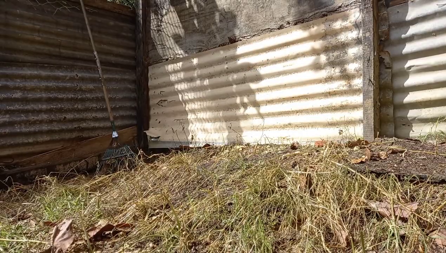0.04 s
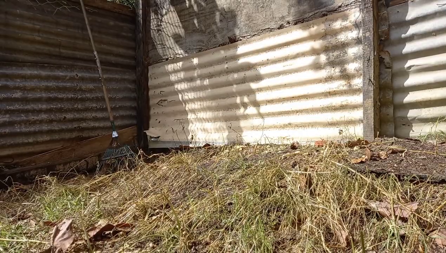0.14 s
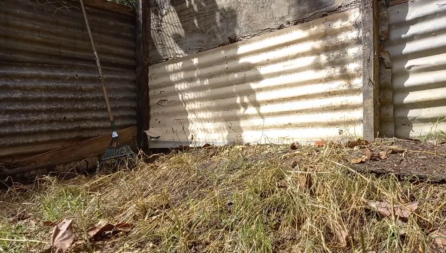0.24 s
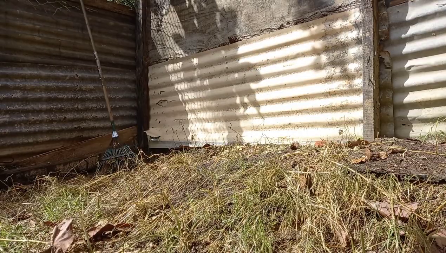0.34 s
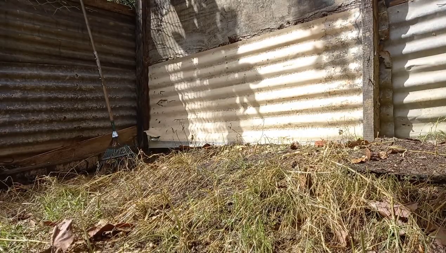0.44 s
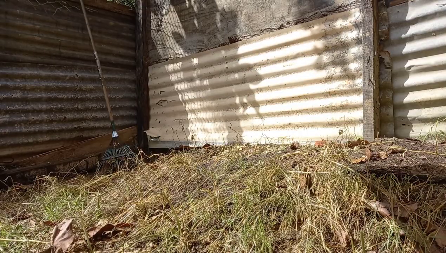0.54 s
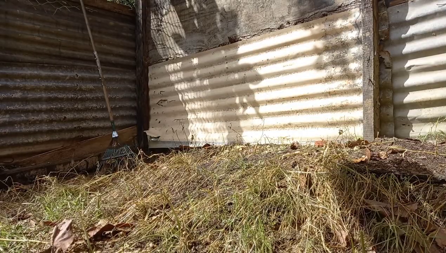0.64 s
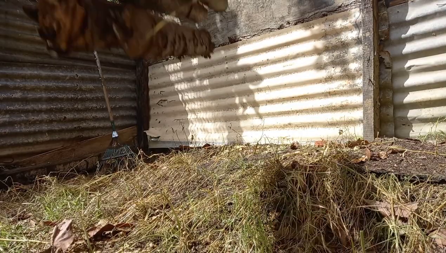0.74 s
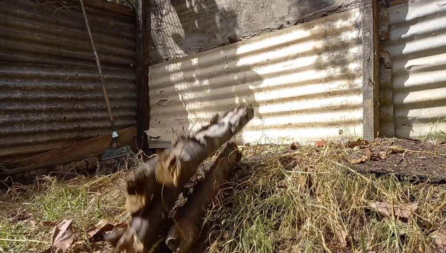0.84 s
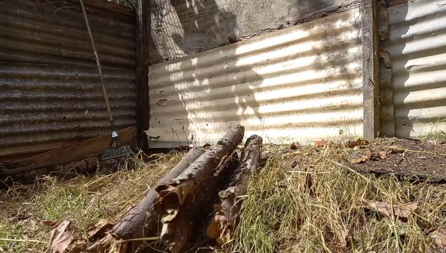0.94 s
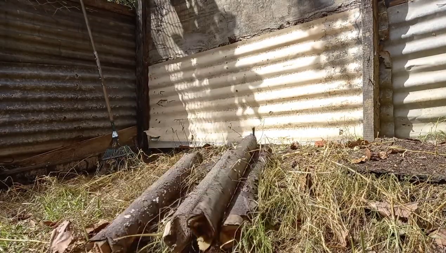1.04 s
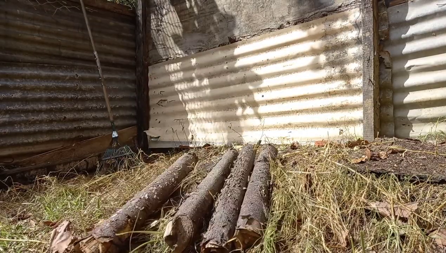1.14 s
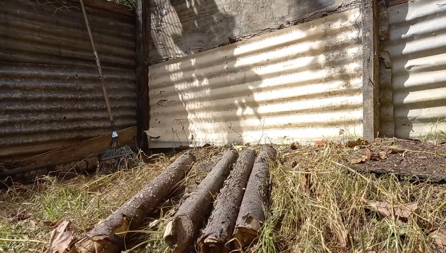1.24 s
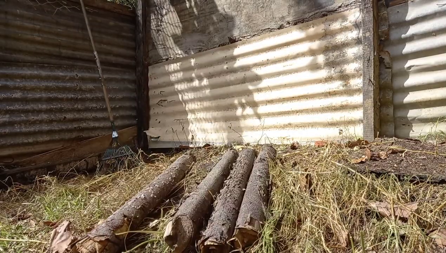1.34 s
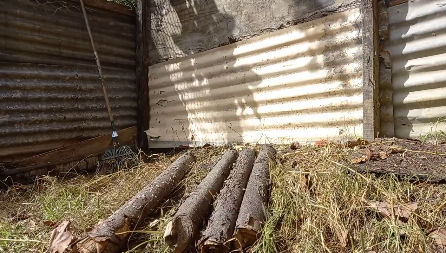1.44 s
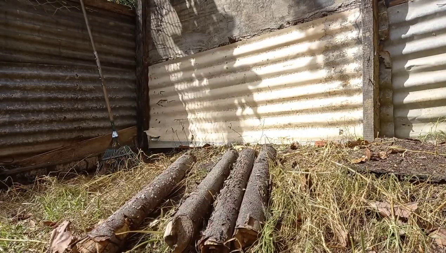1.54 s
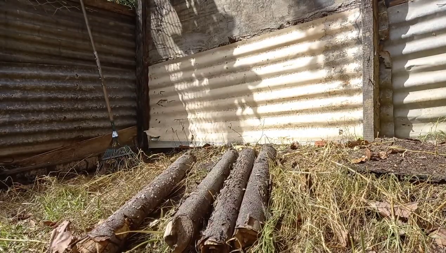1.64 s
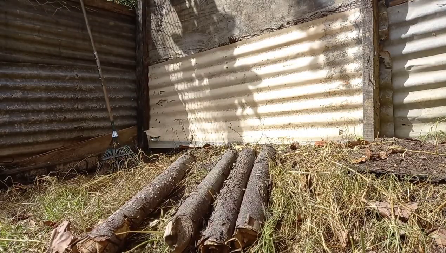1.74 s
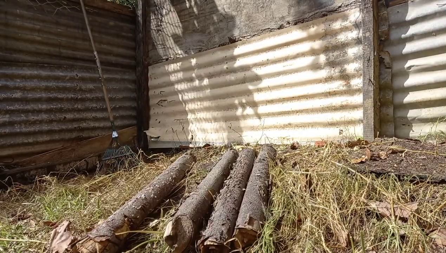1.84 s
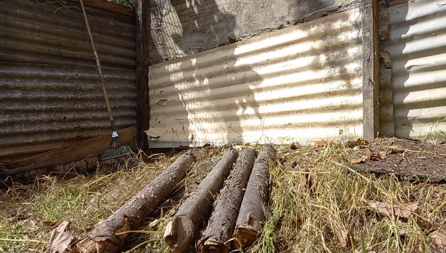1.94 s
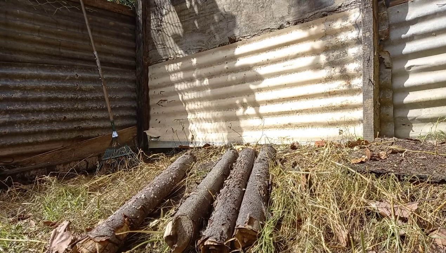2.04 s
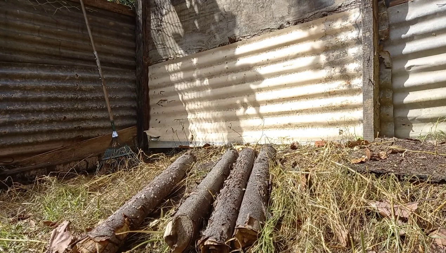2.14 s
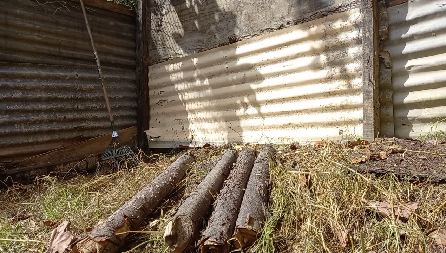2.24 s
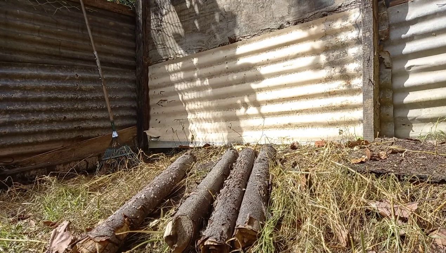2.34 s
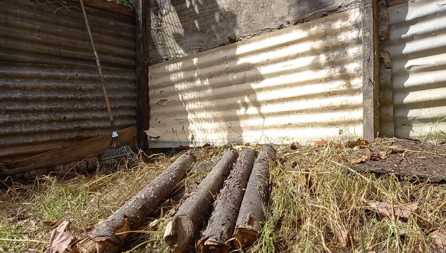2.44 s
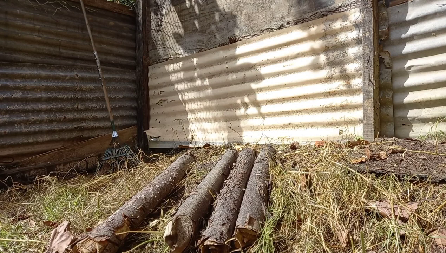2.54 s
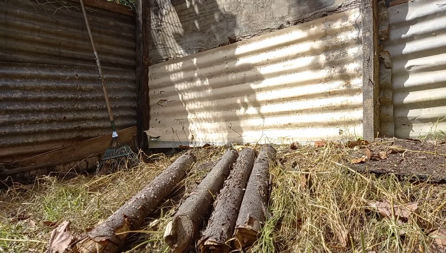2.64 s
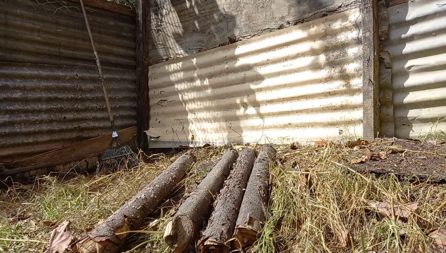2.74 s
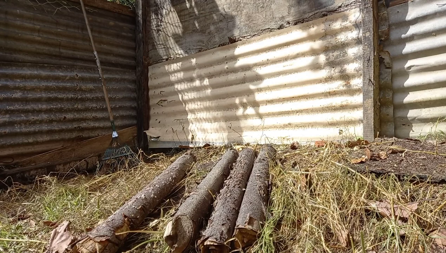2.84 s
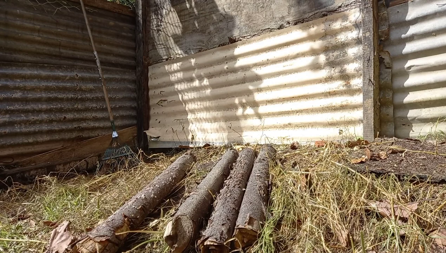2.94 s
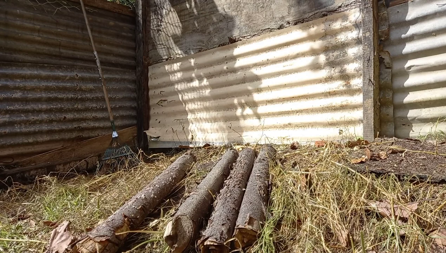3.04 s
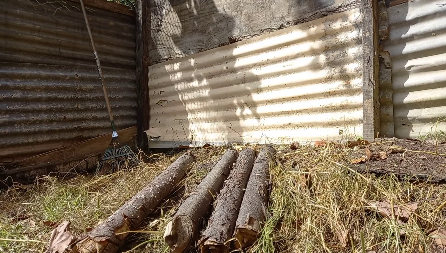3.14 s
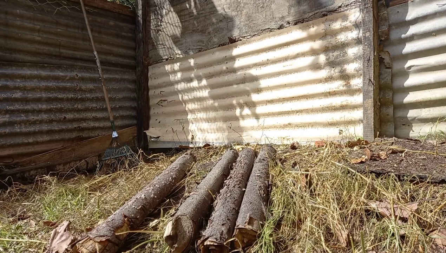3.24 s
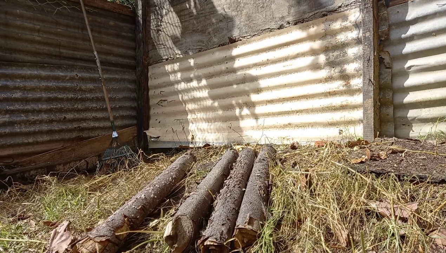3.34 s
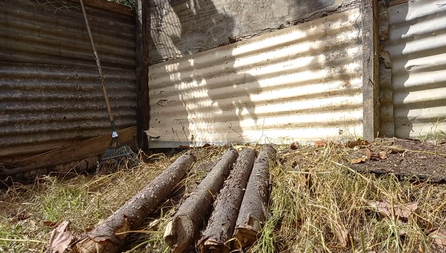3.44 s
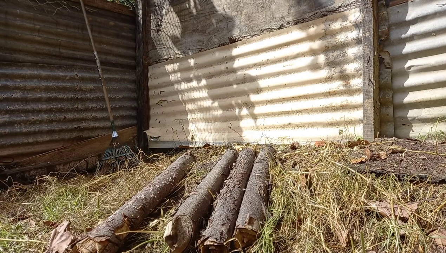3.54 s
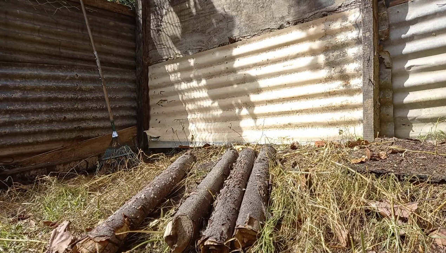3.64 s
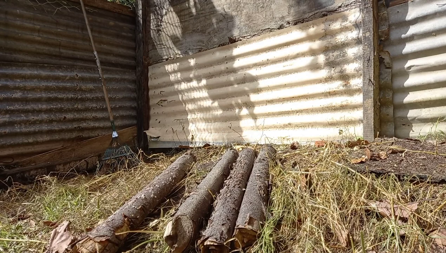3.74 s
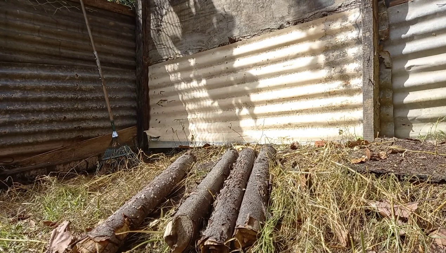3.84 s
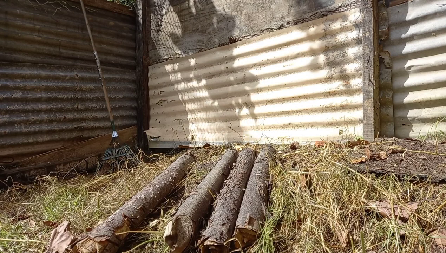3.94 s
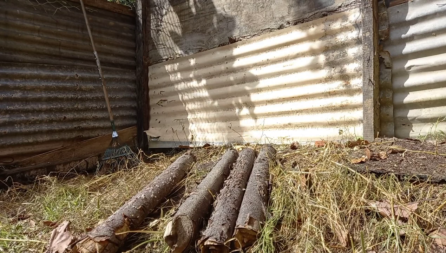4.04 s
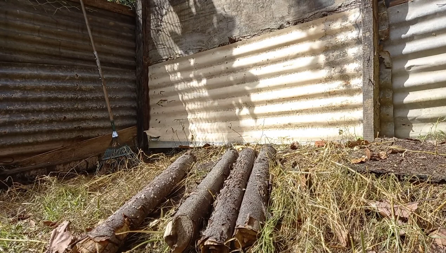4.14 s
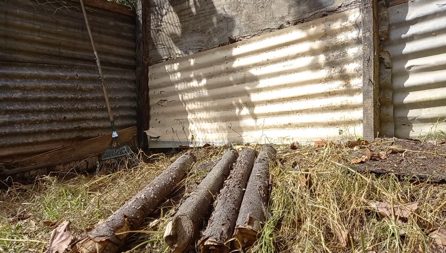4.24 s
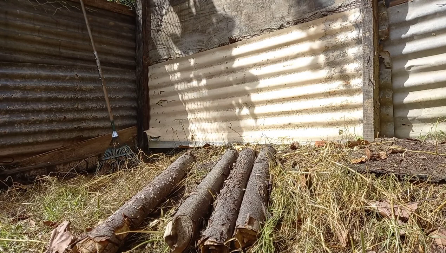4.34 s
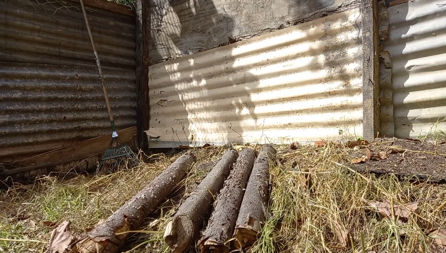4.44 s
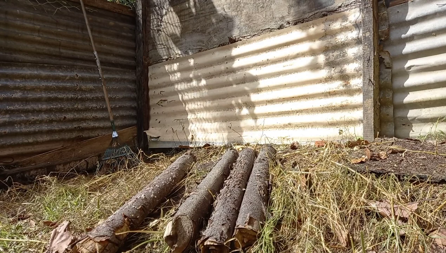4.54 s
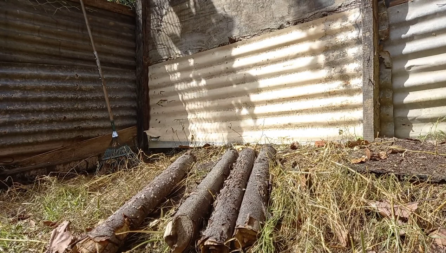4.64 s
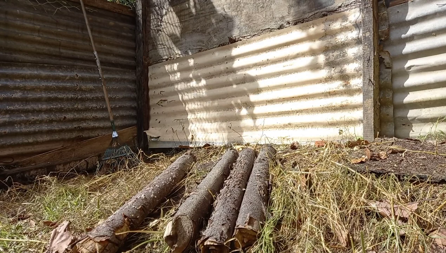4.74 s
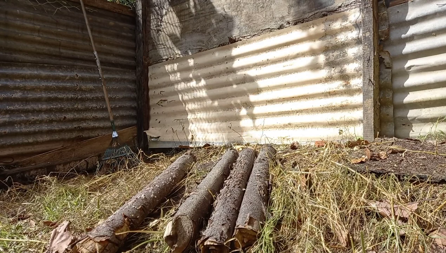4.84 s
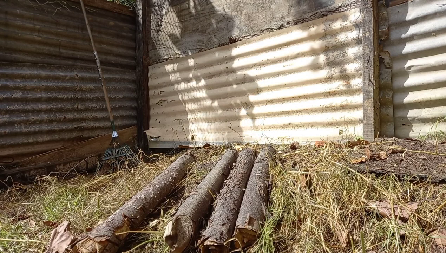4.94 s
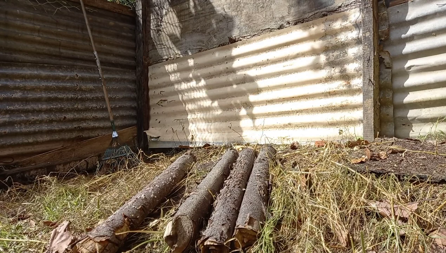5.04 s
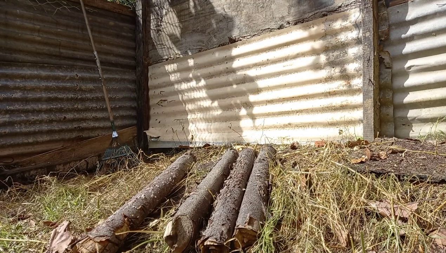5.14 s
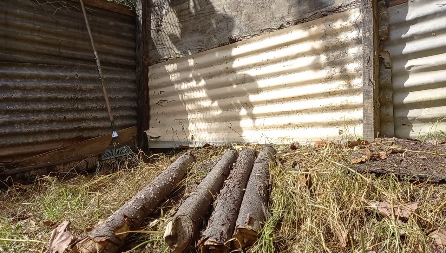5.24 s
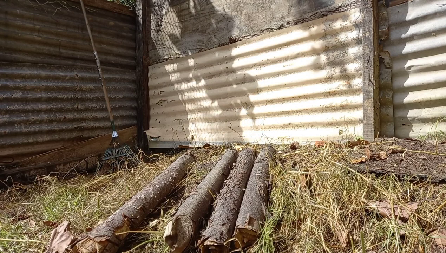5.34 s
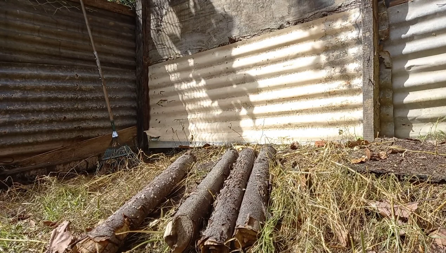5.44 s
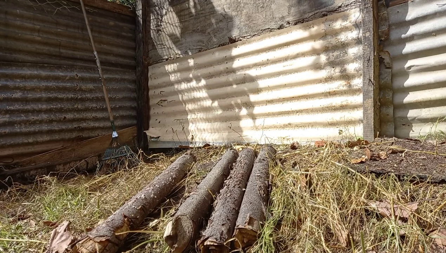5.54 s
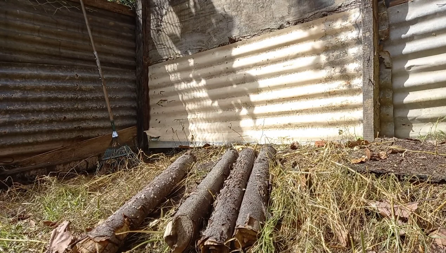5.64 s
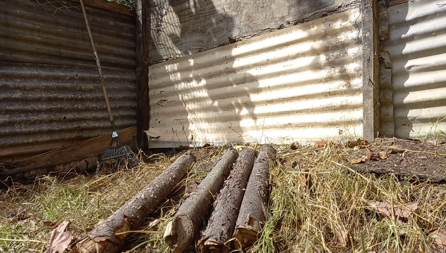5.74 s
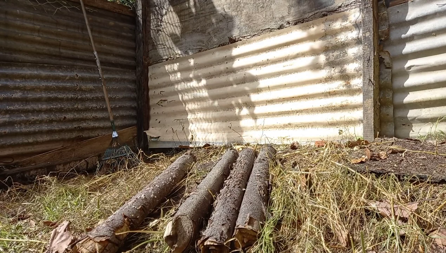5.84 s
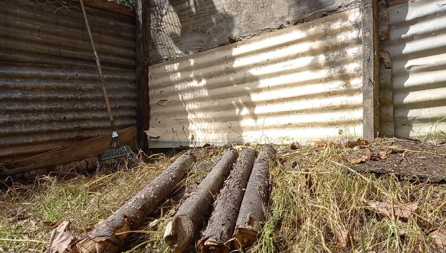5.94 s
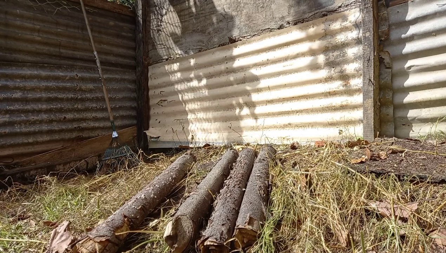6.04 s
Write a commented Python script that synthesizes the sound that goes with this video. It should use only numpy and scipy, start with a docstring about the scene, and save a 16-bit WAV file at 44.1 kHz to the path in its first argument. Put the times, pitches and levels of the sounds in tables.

```python
"""Logs dropped in a yard

An armful of logs bumps once, then falls on dry grass in a yard fenced with corrugated iron; one log rolls to rest.
Logs, soil and a humming fence sheet are fading or swelling sine tones, with bursts of noise for the bark.
Grass, stalks and shifting feet are crackling noise; two soft whumps are swells of low noise and a boom.
Small birds chatter and call in gliding tones, an engine drones far away and shaped noise makes the air."""
import sys
import numpy as np
from scipy import signal
from scipy.fft import rfft, irfft, next_fast_len
from scipy.io import wavfile
from scipy.ndimage import map_coordinates

SR = 44100
rng = np.random.default_rng(int(sys.argv[2]) if len(sys.argv) > 2 else 0)


def to_wav(sig):
    """Store sig (one row per channel, or 1-D mono) as 16-bit WAV at the path in sys.argv[1].

    Samples outside -1..1 are clipped; the rate is SR.
    """
    pcm = np.clip(np.atleast_2d(sig), -1, 1) * 32767
    pcm = np.round(pcm).astype(np.int16)
    wavfile.write(sys.argv[1], SR, pcm.T)  # frames by channels


N = 268727  # length in samples


def amp(db):
    """Turn decibels into a gain."""
    return 10 ** (np.asarray(db) / 20)


def unit(x):
    """Scale a sound to an rms level of 1."""
    return x / np.sqrt(np.mean(x ** 2) + 1e-20)


def along(points, hz):
    """Read a curve of (frequency_hz, value) points on a log frequency axis."""
    f, v = np.transpose(points)
    return np.interp(np.log(hz + 1), np.log(f + 1), v)


def level(curve):
    """Gain per sample from (time_s, level_db) rows, relative to their mean."""
    s, db = np.transpose(curve)
    return amp(np.interp(np.arange(N) / SR, s, db - db.mean()))


def wobble(rate, size=N):
    """A smooth random curve through rate random points a second."""
    points = rng.standard_normal(int(size * rate / SR) + 4)
    return map_coordinates(points, [np.arange(size) * rate / SR])


def filtered(x, response):
    """Multiply the spectrum of x by a response that depends on frequency."""
    n = x.shape[-1]
    m = next_fast_len(n + SR // 5)
    return irfft(rfft(x, m) * response(np.fft.rfftfreq(m, 1 / SR)), m)[..., :n]


def coloured(x, spectrum, size=4096):
    """Shape noise with a (frequency_hz, level_db) spectrum, keeping the power of white noise."""
    cepstrum = irfft(np.log(amp(along(spectrum, np.fft.rfftfreq(size, 1 / SR)))))
    # folding the cepstrum onto positive times makes a filter that never sounds early
    cepstrum[1:size // 2] *= 2
    cepstrum[size // 2 + 1:] = 0
    pulse = irfft(np.exp(rfft(cepstrum)))
    return signal.fftconvolve(x, pulse[None] / np.linalg.norm(pulse), axes=1)[:, :x.shape[1]]


def spread(pair, alike):
    """Mix two unrelated signals into a left and right of the given likeness."""
    def turn(hz):
        return np.arccos(np.clip(along(alike, hz), -1, 1)) / 2

    mid, side = filtered(pair, lambda hz: np.array([np.cos(turn(hz)), np.sin(turn(hz))]))
    return np.array([mid + side, mid - side])


def from_side(pair, lead):
    """A sound from the left reaches the left channel lead seconds before the right; negative is the right."""
    return filtered(pair, lambda hz: np.exp(1j * np.pi * hz * lead * np.array([[1], [-1]])))


def add(track, s, sound):
    """Mix a sound into a track at time s."""
    start = max(round(s * SR), 0)
    track[..., start:start + sound.shape[-1]] += sound[..., :N - start]


def fade(t, t60):
    """Free decay that falls 60 dB in t60 seconds."""
    return np.exp(-np.log(1000) * t / t60)


def crackle(rate, spread_db, hiss):
    """Two streams of tiny fractures, rate a second and uneven in size, over a smooth hiss."""
    sizes = amp(spread_db * np.minimum(rng.exponential(size=(2, N)), 4))
    happens = rng.random((2, N)) < rate / SR
    ticks = happens * sizes * rng.standard_normal((2, N))
    return unit(unit(ticks) + hiss * rng.standard_normal((2, N)))


SAG_DB_PER_S = 29  # a push weakens while it lasts
REBOUND_DB, REBOUND_T60 = -23.5, 0.7  # bent stalks go on rustling as they spring back; t60 in s
LINGER = 0.61  # a push that builds slowly also lets go slowly: seconds of release per second of rise


def pushes(events, release_t60, rebound=False):
    """Gain per sample: each push swells by 60 dB in its rise time, sags while held and dies away."""
    t, power = np.arange(N) / SR, np.zeros(N)
    for s, db, rise, hold in events:
        before = np.maximum(s - t, 0)
        held = np.clip(t - s, 0, hold)
        after = np.maximum(t - s - hold, 0)
        release = fade(after, release_t60 + LINGER * rise)
        if rebound:
            release = np.maximum(release, amp(REBOUND_DB) * fade(after, REBOUND_T60))
        power += (amp(db - SAG_DB_PER_S * held) * fade(before, rise) * release) ** 2
    return np.sqrt(power)


# Tone colour of the surroundings: frequency_hz, relative level_db_per_hz
AIR_COLOUR = [(25, -27.5), (55, -5), (105, -1), (180, -15), (340, -10), (700, -20.5), (1500, -23.5),
              (3100, -26), (5000, -21), (6700, -18.5), (7400, -32.5), (16000, -40.5)]
# How alike left and right are in open air: frequency_hz, likeness (1 = same)
AIR_LIKENESS = [(130, 0.8), (400, 0.43), (1500, 0.1), (6000, .1)]
# Rise and fall of the far surroundings: time_s, relative level_db
FAR_LEVEL = [(0, 3.5), (.7, 1.5), (1.55, -5), (2.7, 2), (4, 0.5), (4.7, -1.5), (6.09, -1.5)]


def air(air_db=-63):
    """The soft rumble and hiss of the neighbourhood: shaped noise of slowly changing level."""
    noise = spread(coloured(rng.standard_normal((2, N)), AIR_COLOUR), AIR_LIKENESS)
    return unit(noise) * amp(air_db + 0.34 * wobble(4)) * level(FAR_LEVEL)


# Course of the far engine: time_s, firing_hz, relative level_db
ENGINE_COURSE = [(0, 51.4, -84.5), (2.351, 55.08, -75), (2.54, 57.25, -54.5), (2.85, 61.95, -53.5),
                 (3.1, 66.92, -62), (3.5, 68.2, -62), (4.3, 67.12, -76), (5.1, 64.5, -61),
                 (6.09, 62.45, -66)]


def engine(engine_db=2, second_db=-11):
    """A far engine speeds up, then eases a little; only its two lowest orders carry."""
    t = np.arange(N) / SR
    s, hz, db = np.transpose(ENGINE_COURSE)
    phase = 2 * np.pi * np.cumsum(np.interp(t, s, hz)) / SR
    gain = amp(np.interp(t, s, db) + engine_db + wobble(7))
    second = np.sin(2 * phase + 0.51 * wobble(12))
    return gain * (np.sin(phase) + amp(second_db) * second)


# How long the yard's late echo lasts: frequency_hz, t60_s
YARD_DECAY = [(100, 0.96), (500, 0.47), (1500, 0.61), (5000, 0.43), (14000, 0.66)]


def yard(x, early_t60=0.09, late_db=-9):
    """The iron fences throw back a quick flutter and a fainter longer tail, made of fading noise."""
    hz, t, z = signal.stft(rng.standard_normal((2, SR * 2 // 3)), SR, nperseg=256)
    late = fade(t, along(YARD_DECAY, hz)[:, None])
    decay = fade(t, early_t60) + amp(late_db) * late
    tail = spread(signal.istft(z * decay, SR, nperseg=256)[1], AIR_LIKENESS)
    delay = round(0.008 * SR)  # the echo starts 8 ms late
    tail = np.pad(tail / np.linalg.norm(tail[0]), ((0, 0), (delay, 0)))
    return signal.fftconvolve(x, tail, axes=1)[:, :N]


# Short rasping bird calls: start_s, relative level_db, pitch_hz (middle of the upward glide)
BIRD_CALLS = [(0.283, -53.5, 1992), (0.599, -53, 2004), (1.40, -59, 2037), (1.71, -59, 2010),
              (2.039, -58, 2027), (2.389, -54.5, 2005), (2.79, -51.5, 2040), (3.10, -52, 1998),
              (3.41, -51, 2042), (3.80, -50.5, 2030), (4.12, -53.5, 1992), (4.43, -52, 1990),
              (4.70, -66, 2094), (5.53, -63, 2108), (5.70, -60.5, 2106), (5.89, -65.5, 2070)]
# Thin bird whistles: start_s, length_s, relative level_db, start_pitch_hz, end_pitch_hz
BIRD_WHISTLES = [(1.22, 0.039, -50, 4830, 4775), (1.258, 0.11, -57.5, 4440, 3000),
                 (3.938, .1, -48, 5150, 4655), (4.022, 0.098, -55.5, 3620, 2950),
                 (4.986, 0.057, -45, 4545, 5140), (5.006, 0.0496, -47, 5390, 5530),
                 (5.051, 0.11, -55.5, 3480, 2870), (5.205, 0.15, -45, 5200, 3110)]
# Far birds blend into two bands: centre_hz, half_width_hz, relative level_db
FLOCK_BANDS = [(2070, 110, -6), (4124, 240, -2)]


def rasping_calls(call_s=0.063, rise=0.11, rasp=0.026, low_db=-7, chirp_db=3):
    """Rising, trilled calls with a rough pitch, strongest on their second harmonic."""
    out = np.zeros(N)
    u = np.linspace(0, 1, round(call_s * SR))  # progress through a call
    for s, db, pitch_hz in BIRD_CALLS:
        hz = pitch_hz * (1 + rise * (u - 0.5) + rasp * wobble(700, size=len(u)))
        phase = 2 * np.pi * np.cumsum(hz) / SR
        trill = 1 + 0.7 * np.sin(2 * np.pi * 190 * u * call_s)  # 190 beats a second
        voice = np.sin(2 * phase) + amp(low_db) * 2 * u * np.sin(phase)
        add(out, s, amp(db + chirp_db) * np.sqrt(4 * u * (1 - u)) * trill * voice)
    return out


def whistles(quaver=0.013, hoarse=0.424, whistle_db=1):
    """Thin gliding tones with an unsteady pitch."""
    out = np.zeros(N)
    for s, length, db, start_hz, end_hz in BIRD_WHISTLES:
        u = np.linspace(0, 1, round(length * SR))
        depth = quaver + hoarse * abs(np.log(end_hz / start_hz))  # wide sweeps are the hoarsest
        hz = (start_hz + (end_hz - start_hz) * u) * (1 + depth * wobble(1500, size=len(u)))
        tone = np.sin(2 * np.pi * np.cumsum(hz) / SR)
        add(out, s, amp(db + whistle_db) * np.sin(np.pi * u) * tone)
    return out


def flock(chatter_db=-65):
    """The far flock is noise in two bands with a restless level."""
    def bands(hz):
        return sum(amp(db) * np.exp(-0.5 * ((hz - centre) / width) ** 2) for centre, width, db in FLOCK_BANDS)

    noise = unit(filtered(rng.standard_normal((2, N)), bands))
    return noise * amp(chatter_db + 4.5 * wobble(8.1) + 1.4 * wobble(90)) * level(FAR_LEVEL)


def birds(direct_db=-8, wet_db=-3):
    """Calls and whistles, direct and echoed, over the chatter of the far flock."""
    voices = rasping_calls() + whistles()
    echo = yard(np.array([voices, voices]), early_t60=0.037, late_db=-2)
    return amp(direct_db) * voices + amp(wet_db) * echo + flock()


# Soft low swells: start_s (full strength), relative level_db, rise_s, hold_s
WHUMP_SWELLS = [(3.85, -41.5, 0.217, 0.033), (5.195, -38.5, 0.21, 0.042)]
# Tone colour of the swells: frequency_hz, relative level_db_per_hz
WHUMP_COLOUR = [(25, -32.5), (60, 5), (120, 0), (180, -11), (300, -10.5), (450, -20), (700, -29.5),
                (1700, -30), (4000, -21), (6700, -26.5), (7500, -40), (16000, -51.5)]


def whumps(whump_db=-2, boom_db=0, boom_hz=103, release_t60=0.32, lead=-0.000392):
    """Two soft low swells of noise from the right, each with a wavering boom at its core."""
    noise = coloured(rng.standard_normal((2, N)), WHUMP_COLOUR)
    noise = spread(noise, [(150, 0.92), (600, 0.52), (3000, 0.21)])
    boom = np.sin(2 * np.pi * boom_hz * np.arange(N) / SR + 1.43 * wobble(28))
    core = amp(whump_db) * unit(noise) + amp(boom_db) * boom
    swell = pushes(WHUMP_SWELLS, release_t60) * core
    return from_side(swell, lead) * amp([[-1], [1]])


# Grass rustles, and a faint hiss swells around the second soft whump:
# start_s (full strength), relative level_db, rise_s, hold_s
GRASS_RUSTLES = [(0.08, -62, 0.41, .03), (0.108, -51, .07, .06), (.2, -59.5, .25, 0.024),
                 (0.48, -61, .12, 0.034), (1.83, -67.5, 0.36, 0.067), (2.03, -63.5, 0.16, .04),
                 (2.14, -69.5, .3, .06), (2.492, -45.5, 0.017, 0.16), (2.69, -49.5, .05, 0.00508),
                 (2.87, -73, .4, .06), (3.335, -62, 0.16, 0.098), (3.41, -58.5, 0.042, .025),
                 (3.49, -64, 0.31, 0.034), (3.715, -65.5, 0.054, .05), (3.79, -59.5, 0.148, .07),
                 (3.97, -67, .4, 0.08), (4.17, -68.5, 0.49, .01), (4.49, -78.5, 0.27, .04),
                 (5.19, -71, 0.99, 0.0787), (5.75, -70, 0.031, 0.0201), (5.81, -70, .1, .04)]
# A sole scuffs the soil: start_s (full strength), relative level_db, rise_s, hold_s
SOLE_SCUFFS = [(0.15, -50, 0.51, 0.035), (0.375, -62, .05, .01), (0.492, -58, 0.19, .05),
               (1.87, -63.5, 0.49, .15), (2.232, -56, 0.134, .015), (2.46, -54.5, 0.06, 0.027)]
# Tone colour of rustling straw: frequency_hz, relative level_db_per_hz
STRAW_COLOUR = [(150, -50), (250, -15), (576, -3.5), (710, -7), (1160, -5.5), (1640, -5), (2570, -3.5),
                (4120, -4), (4730, -8.5), (6360, -1.5), (7570, -12), (13200, -8.5), (16000, -17)]
# How alike left and right are for grass: frequency_hz, likeness (1 = same)
GRASS_LIKENESS = [(300, .9), (1500, 0.98), (4000, 0.12), (12000, .15)]


def feet(rustle_db=6, scuff_db=-2, rustle_t60=0.16, scuff_t60=0.25, uneven_db=1.98, lead=0.0003):
    """To the left, grass rustles as feet shift, soles scuff and a hiss swells around the second whump."""
    straw = spread(coloured(crackle(rate=1700, spread_db=3.5, hiss=1.0), STRAW_COLOUR), GRASS_LIKENESS)
    soil_colour = [(150, -9.0), (450, -5.0), (1100, -2.0), (1700, 0.5), (3000, -9.5), (8000, -30)]
    grit = coloured(crackle(rate=990, spread_db=4, hiss=0.9), soil_colour)
    swell = pushes(GRASS_RUSTLES, rustle_t60, rebound=True)
    rustle = amp(rustle_db + uneven_db * wobble(80)) * swell * straw
    scuff = amp(scuff_db) * pushes(SOLE_SCUFFS, scuff_t60) * spread(grit, AIR_LIKENESS)
    return from_side(rustle + scuff, lead) * amp([[1.2], [-1.2]])


# Single stalks break: start_s, relative level_db, narrow_db (above 0 the crack sounds narrower, below 0 wider)
STALK_SNAPS = [(0.191, -35.5, -2), (.227, -35.5, -0.5), (.279, -43, 0.5), (.654, -51, 0.5),
               (0.811, -39, -1), (0.8483, -33, -1), (0.8632, -23.5, -2.5), (0.8777, -11.5, -0.5),
               (.889, -12, 0), (.897, -12, -4), (1.040, -25, -1), (1.0808, -20, -1.5), (1.096, -23.5, 0.5),
               (1.124, -24, 0.5), (1.1847, -27, -2), (1.188, -33.5, -2), (1.225, -42.5, 3),
               (1.945, -41.5, -5.5), (2.0627, -44.5, 12), (2.213, -32, -1), (2.492, -28.5, -4),
               (2.628, -25.5, 4.5), (2.632, -24, 8.5), (2.687, -19.5, 0.5), (3.408, -39.5, 5),
               (3.425, -36, -2), (5.7498, -44, -7), (5.803, -46, -2)]


def snaps(snap_db=-6, t60=0.009):
    """Thicker stalks break with one short crack: a quickly fading burst of noise."""
    out, t = np.zeros((2, N)), np.arange(SR // 20) / SR
    for s, db, narrow_db in STALK_SNAPS:
        mid_side = amp([[narrow_db / 2], [-narrow_db / 2]])
        crack = fade(t, t60) * rng.standard_normal((2, len(t)))
        add(out, s, amp(db + snap_db) * mid_side * crack)
    colour = [(200, -20.0), (1500, -5), (4000, -2.5), (6500, 5.5), (7700, -11.5), (13000, -8), (16000, -19.5)]
    return spread(coloured(out, colour), GRASS_LIKENESS)


# A log presses into the grass: start_s (full strength), relative level_db, rise_s, hold_s
LOG_PRESSES = [(0.881, -30.5, .06, 0.0073), (1.04, -48.5, .03, .003), (1.081, -40.5, .05, 0.014),
               (1.14, -54, .05, 0.0044), (1.189, -61.5, .015, .02)]
# Tone colour of crushed stalks: frequency_hz, relative level_db_per_hz
CRUSHED_COLOUR = [(150, -38.5), (250, -5.5), (354, -10), (460, -3.5), (662, -17), (1020, -5.5), (1160, -5),
                  (1880, -8), (6470, -3.5), (7700, -13.5), (13400, -11), (16000, -13.5)]


def crushed_grass(crush_db=3, release_t60=0.23, uneven_db=-1.1):
    """Dry stalks crackle under each landing log: many tiny fractures over a hiss."""
    stalks = coloured(crackle(rate=1900, spread_db=0.5, hiss=0.62), CRUSHED_COLOUR)
    stalks = spread(stalks, GRASS_LIKENESS)
    return amp(crush_db + uneven_db * wobble(130)) * pushes(LOG_PRESSES, release_t60) * stalks


# Logs meet the soil: start_s, relative level_db, pitch_hz, t60_s
SOIL_THUDS = [(0.882, -17, 103.4, 0.22), (0.8816, -11, 196.4, 0.062), (0.881, -31, 64, 0.36),
              (0.93, -44, 125, 0.49), (1.075, -53.5, 132.4, 0.21)]
# The fence sheet's low hum swells and sinks after the logs land:
# start_s (full strength), relative level_db, rise_s, hold_s
FENCE_HUM = [(0.925, -36, .09, 0.11), (1.085, -39, .2, 0.031), (1.255, -55.5, .15, 0.043)]


def ground(hum_hz=80.5, hum_db=2, hum_t60=0.088, attack=0.0057):
    """The soil takes the weight with low, fading thuds; a fence sheet's low hum then swells and sinks."""
    out, t = np.zeros(N), np.arange(SR // 2) / SR
    for s, db, hz, t60 in SOIL_THUDS:
        thud = np.sin(2 * np.pi * hz * t) * fade(t, t60) * (1 - np.exp(-t / attack))
        add(out, s, -amp(db) * thud)
    hum = np.sin(2 * np.pi * hum_hz * np.arange(N) / SR + 0.3 * wobble(17))
    return out + amp(hum_db) * pushes(FENCE_HUM, hum_t60) * hum


# Wood on wood, and dull low knocks within the heavy rustle at 2.5 s:
# start_s, relative ring_db, lowest_pitch_hz, relative clack_db, ring_length (share of the modes' t60)
KNOCK_EVENTS = [(0.1105, -18.5, 536.6, -43, 0.45), (0.1115, -28, 433, -64, 0.7),
                (0.1122, -25.5, 349, -61, 0.37), (0.1207, -38, 546, -40.5, 0.29),
                (0.141, -37.5, 552, -45.5, 0.71), (0.877, -28, 300, -19, 0.9),
                (0.888, -18, 480, -16.5, 0.63), (0.8900, -10.5, 419.3, -13, 0.88),
                (0.8955, -13.5, 537.5, -13.5, 0.83), (0.8962, -21.5, 456.4, -11, .5),
                (0.897, -22, 301.4, -20, 0.76), (0.907, -22, 335, -21, 0.78),
                (0.9140, -19.5, 413, -23, 0.66), (0.929, -22.5, 440, -27.5, .5),
                (.942, -32.5, 546, -32.5, 0.63), (1.082, -41.5, 483, -47, 0.29),
                (1.224, -65, 621, -56.5, .5), (2.454, -69, 636, -59, 0.42), (2.499, -48.5, 573, -60, 0.82),
                (2.515, -53, 404, -55, 0.75), (2.535, -46.5, 574, -52, 0.39), (3.325, -55, 399, -65, 0.73),
                (4.138, -43, 417, -64, 0.48), (4.141, -53, 535, -62, 0.85), (4.158, -49, 390, -59, 0.56)]
# A log's bending modes: pitch_ratio (multiple of the lowest), relative level_db, t60_s (before ring_length)
LOG_MODES = [(1, 2, 0.14), (1.8, -10, 0.054), (1.96, -5, .08), (2.15, -3, 0.045), (2.82, -7.5, 0.05),
             (3.42, -21.5, 0.062), (3.77, -23.5, 0.13), (4.58, -20.5, .08), (5.25, -21.5, .07),
             (5.9, -24.5, .07), (7.07, -26.5, 0.035)]
# Tone colour of bark on bark: frequency_hz, relative level_db_per_hz
BARK_COLOUR = [(30, -41), (70, -19), (180, -2.5), (350, -7), (650, -4), (980, 1), (1400, -8.5),
               (2000, -11.5), (2700, -13.5), (3300, -25.5), (5000, -25.5), (6600, -17.5), (7600, -42.5),
               (16000, -41)]


def logs(clack_t60=0.028, attack=0.0011, vary_db=0.83, lead=0.00008):
    """Logs ring in a few damped bending modes as bark clacks; dull knocks in the rustle sound the same way."""
    rings, clacks, t = np.zeros((2, N)), np.zeros((2, N)), np.arange(SR // 3) / SR
    for s, ring_db, pitch_hz, clack_db, length in KNOCK_EVENTS:
        soft_db = min(0, 0.5 * (clack_db - ring_db + 2))  # a soft contact hardly wakes the upper modes
        ring = np.zeros(len(t))
        for ratio, db, t60 in LOG_MODES:
            change_db = (soft_db + vary_db * rng.normal()) * (ratio > 1)
            ring += amp(db + change_db) * fade(t, t60 * length) * np.sin(2 * np.pi * pitch_hz * ratio * t)
        onset = 1 - np.exp(-t / attack * amp(soft_db))  # and starts more gently
        add(rings, s, amp(ring_db) * ring * onset)
        add(clacks, s, amp(clack_db) * fade(t, clack_t60) * rng.standard_normal((2, len(t))))
    clacks = spread(coloured(clacks, BARK_COLOUR), [(200, 1.0), (450, 0.59), (1000, 0.26), (4000, 0.4)])
    return from_side(rings, lead) * amp([[-1], [1]]) + amp(5.5) * clacks


def scene(wood_wet_db=-14, grass_wet_db=-9, low_lead=0.00022):
    """The surroundings, the near sounds and their answer from the fences."""
    surroundings = air() + birds() + whumps()
    low = from_side(engine() + ground(), low_lead) * amp([[-0.3], [0.3]])
    straw = feet() + snaps() + crushed_grass()
    wood = logs()
    echo = yard(amp(wood_wet_db) * wood + amp(grass_wet_db) * straw)
    return surroundings + low + straw + wood + echo


def record(dry):
    """The recorder rounds off the highest peaks and keeps nothing above its band limit."""
    top_hz = 15950
    rounded = dry / (1 + np.abs(dry / 0.9) ** 6) ** (1 / 6)
    return filtered(rounded, lambda hz: hz < top_hz)


dry = scene()
out = record(dry)
to_wav(out)
```